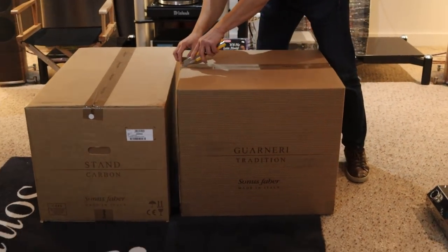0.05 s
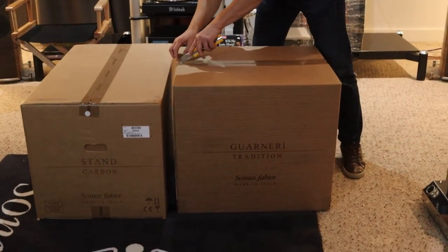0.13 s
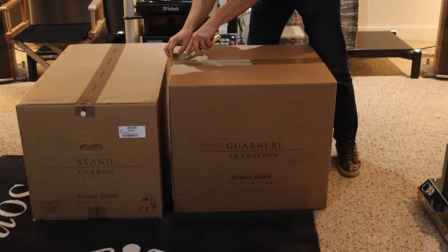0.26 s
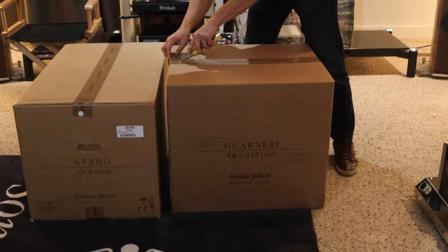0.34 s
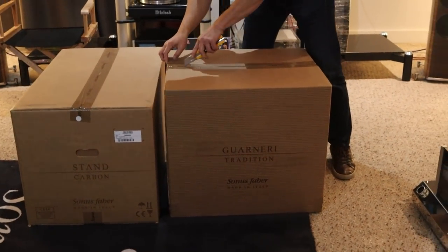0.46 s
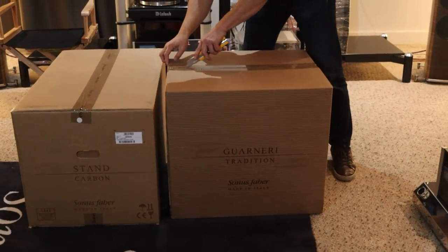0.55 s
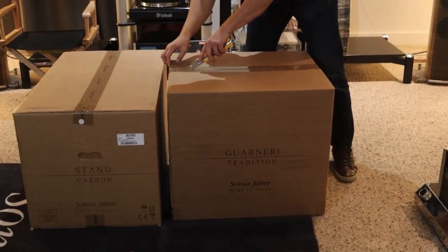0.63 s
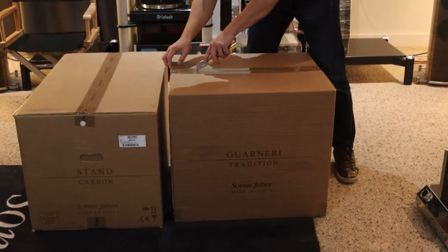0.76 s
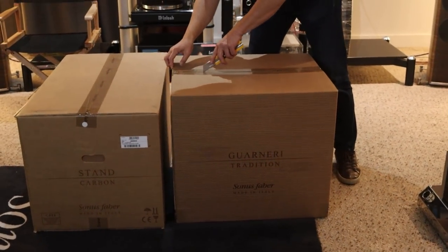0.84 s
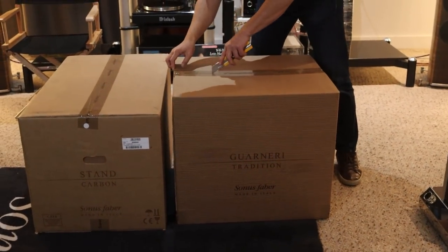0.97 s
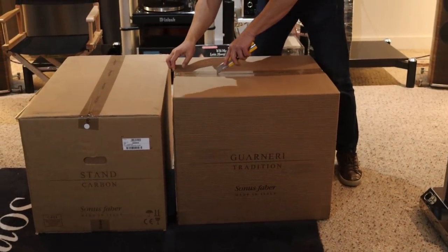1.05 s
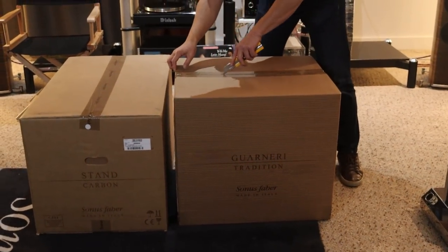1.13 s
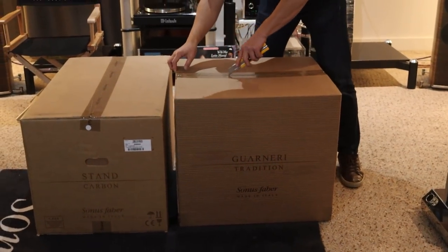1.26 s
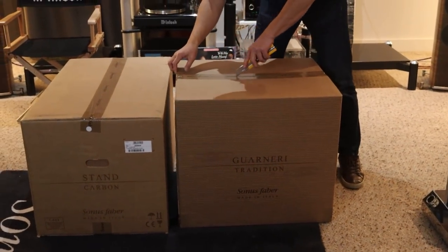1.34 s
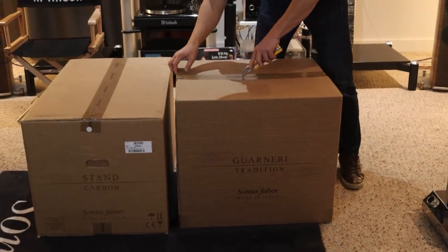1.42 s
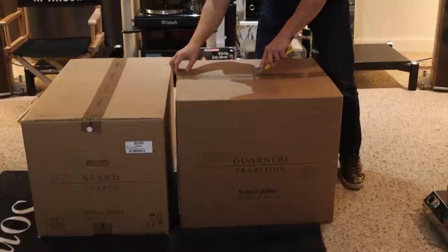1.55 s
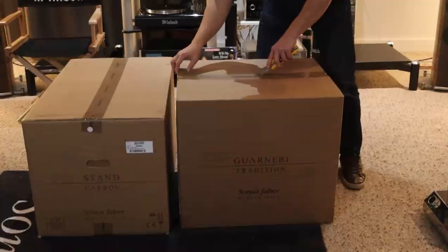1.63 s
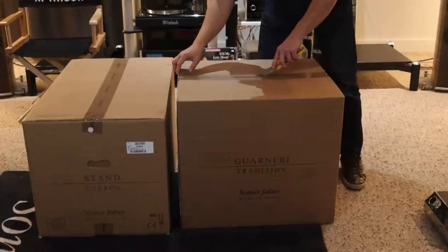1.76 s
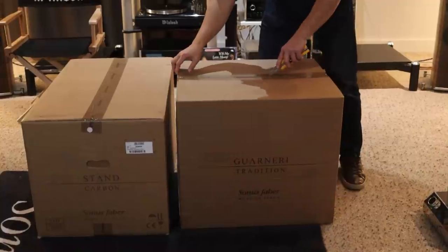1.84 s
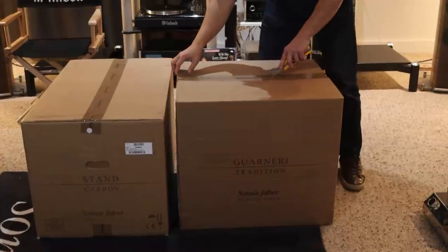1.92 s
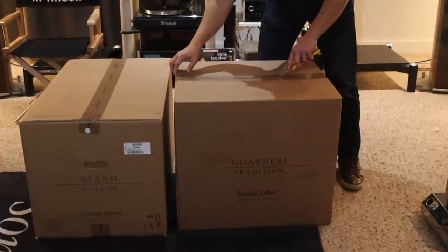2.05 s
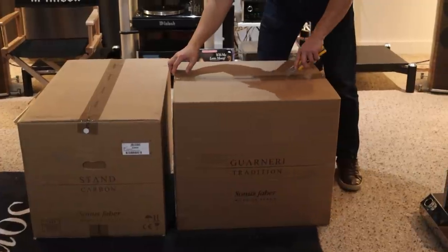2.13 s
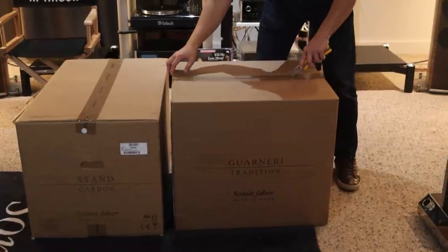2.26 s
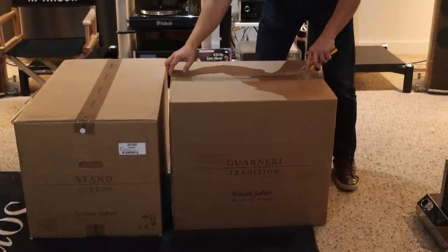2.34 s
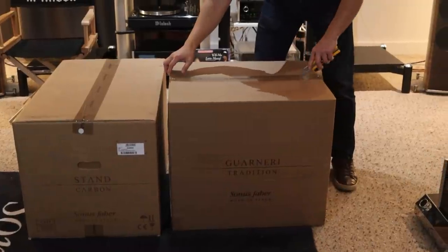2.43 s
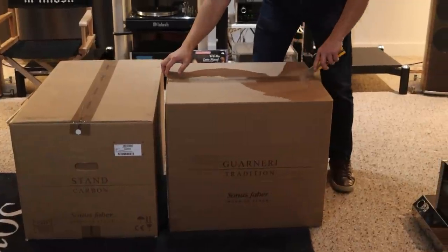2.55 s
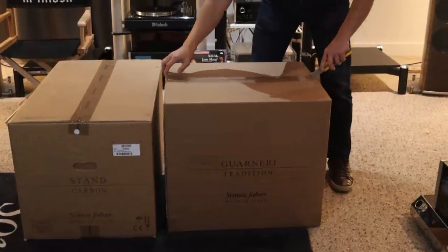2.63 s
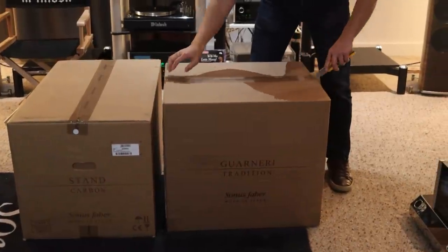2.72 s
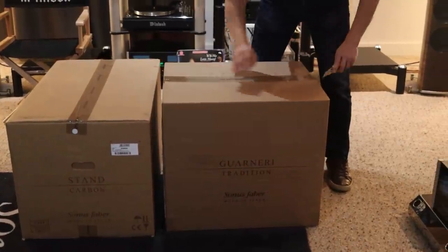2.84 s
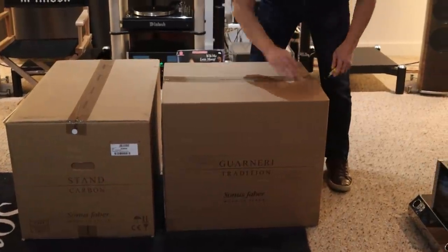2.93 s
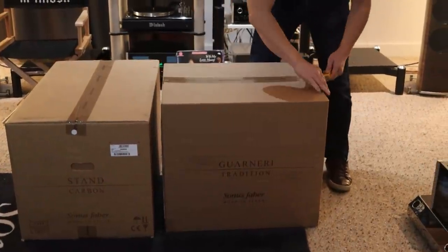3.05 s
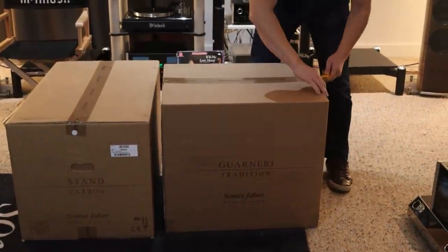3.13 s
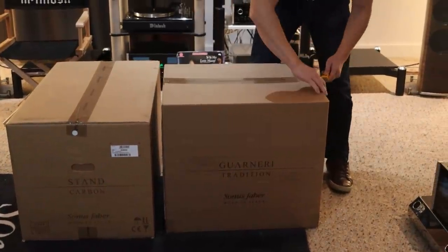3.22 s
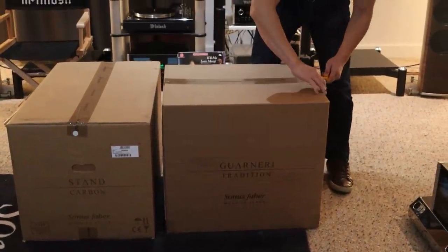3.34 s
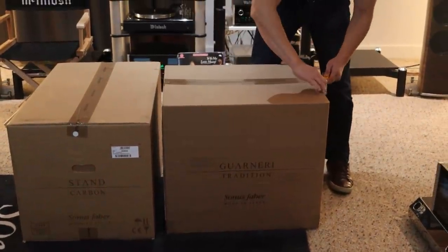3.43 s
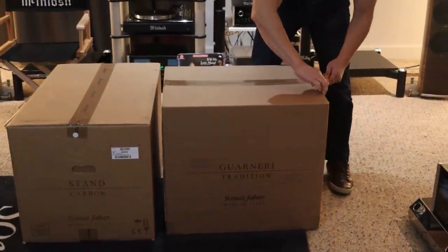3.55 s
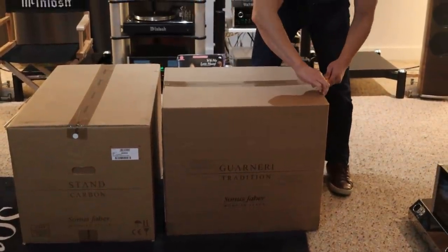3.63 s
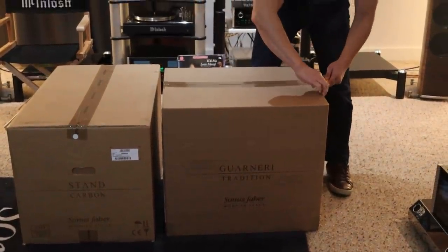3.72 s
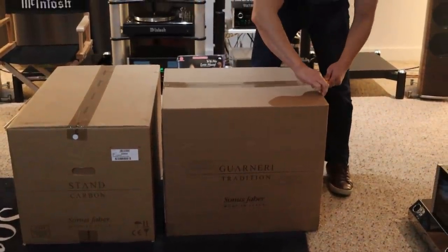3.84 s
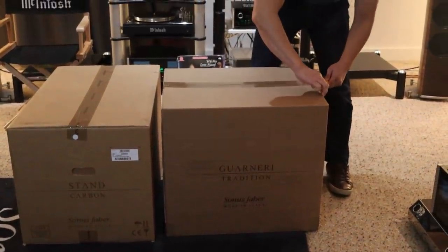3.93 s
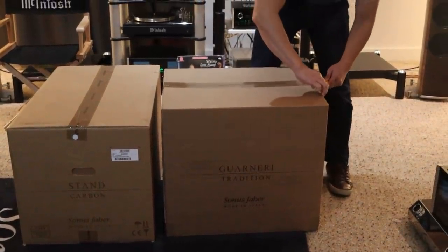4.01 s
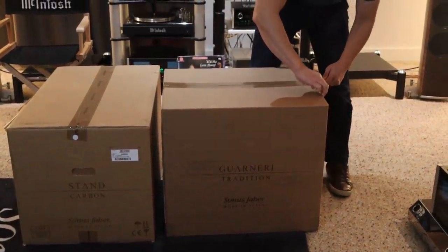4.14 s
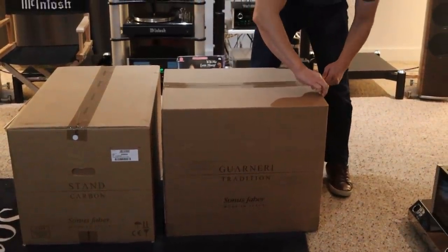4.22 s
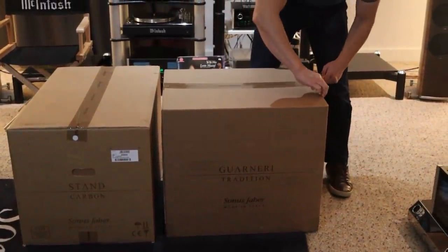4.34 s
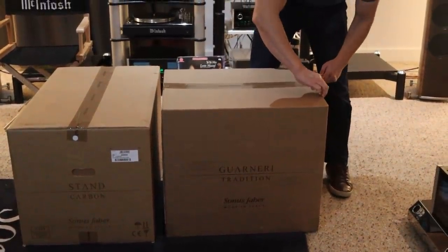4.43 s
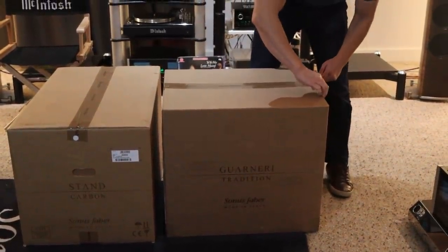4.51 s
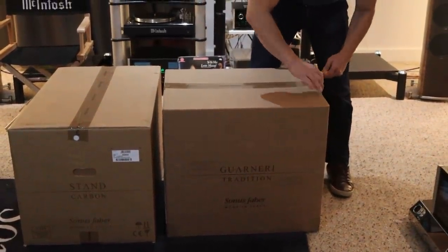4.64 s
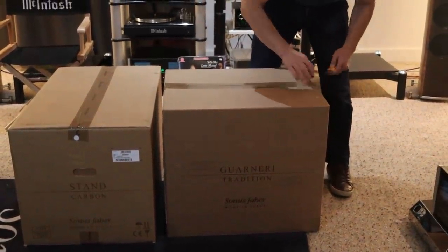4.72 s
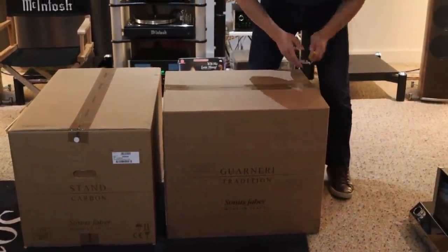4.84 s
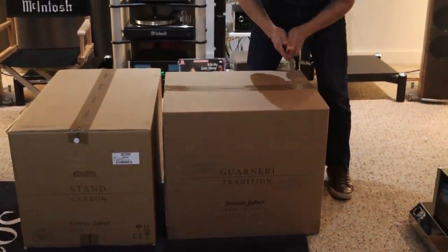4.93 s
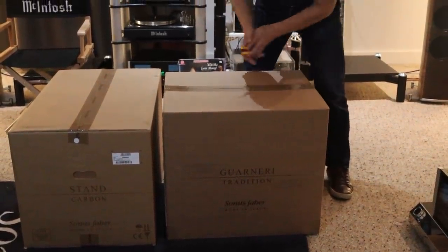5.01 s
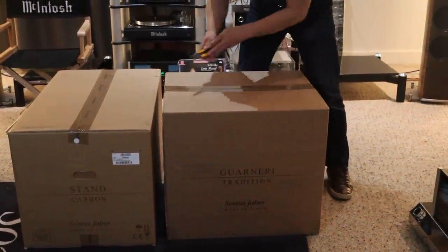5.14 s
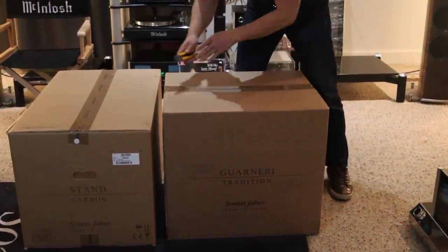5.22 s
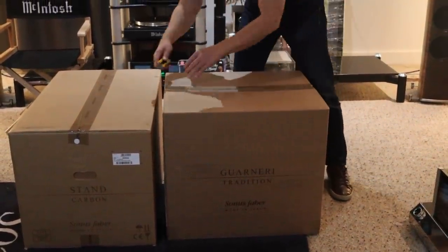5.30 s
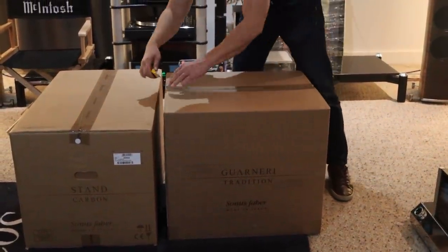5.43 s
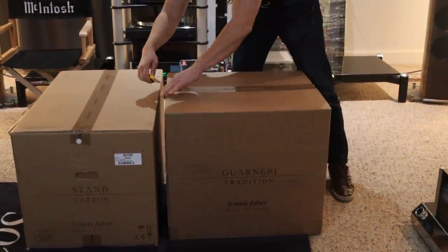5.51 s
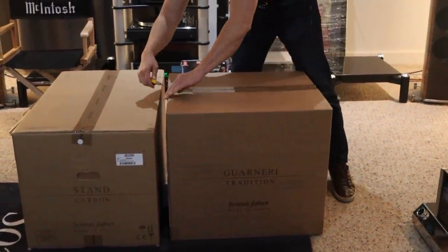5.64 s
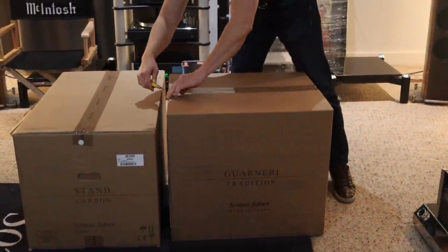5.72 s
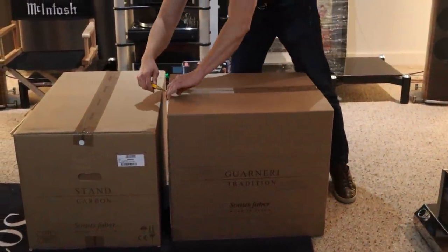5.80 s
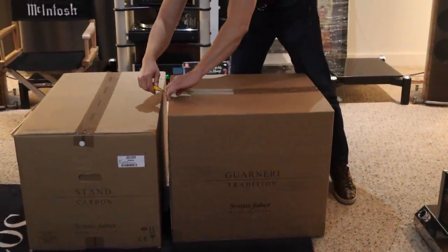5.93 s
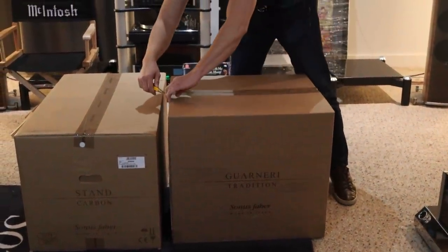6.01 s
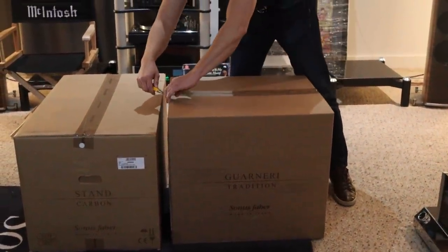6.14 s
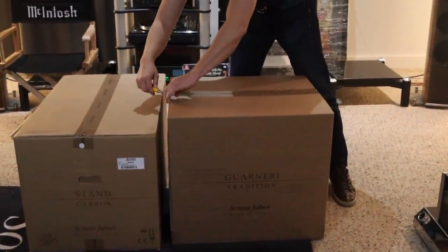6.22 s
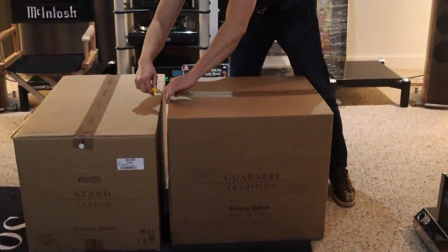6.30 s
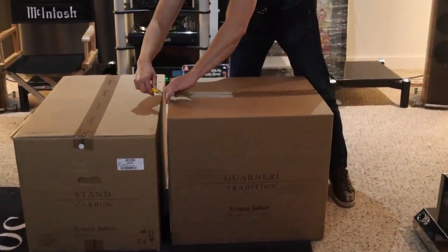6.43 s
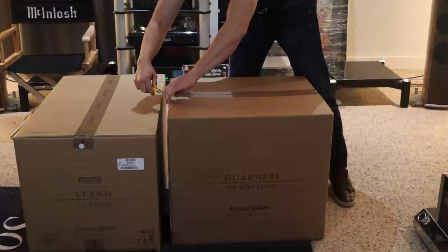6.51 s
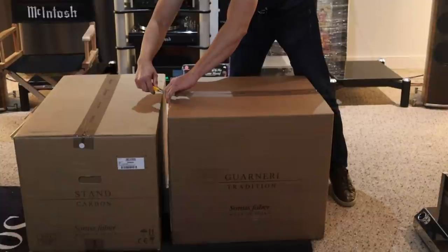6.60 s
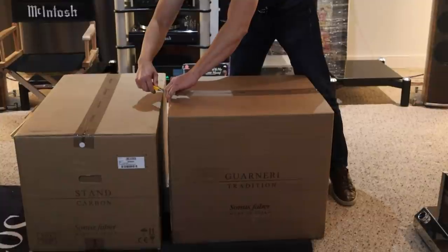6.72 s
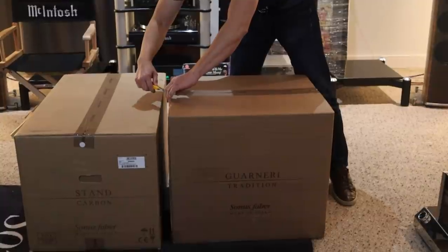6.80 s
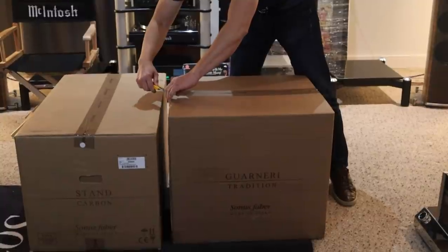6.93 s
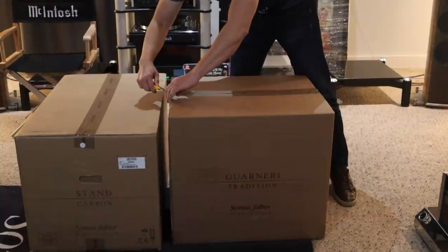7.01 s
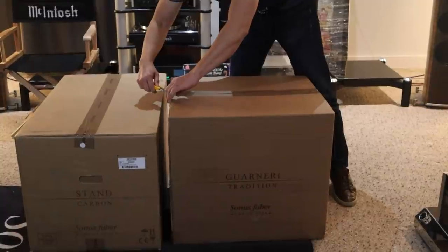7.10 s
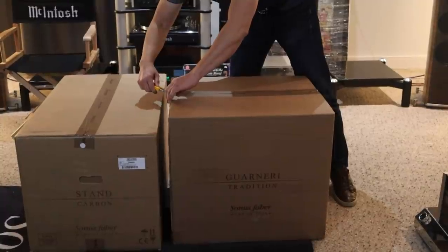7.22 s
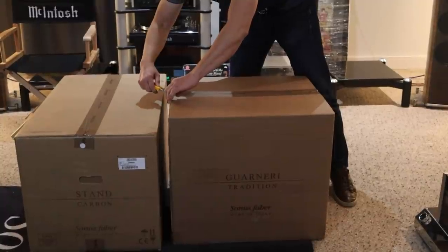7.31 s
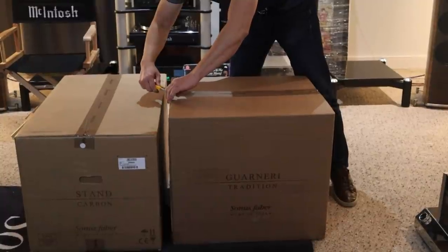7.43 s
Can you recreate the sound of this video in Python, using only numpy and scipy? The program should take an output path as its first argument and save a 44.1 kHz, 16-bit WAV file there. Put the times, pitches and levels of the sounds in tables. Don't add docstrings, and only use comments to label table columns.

```python
import sys
import numpy as np
from scipy import signal
from scipy.fft import rfft, irfft
from scipy.io import wavfile

SR = 44100
rng = np.random.default_rng(int(sys.argv[2]) if len(sys.argv) > 2 else 0)


def unload_wav(signal):
    wavfile.write(
        sys.argv[1],
        SR,
        np.round(np.clip(np.atleast_2d(signal).T, -1, 1) * 32767).astype(np.int16),
    )


def attenuation_scalar(level_db):
    decades = np.asarray(level_db, float) / 20
    return 10 ** decades


N = 328986

# f/Hz, level/dB per Hz
HISS = [(15, -83.5), (25, -52), (92, -14), (102, -3.5), (123, -2.5), (149, -25), (242, -13), (301, -26.5),
        (363, -17), (439, -25), (1070, -25.5), (1290, -30), (4140, -33.5), (12500, -29.5), (16000, -33.5)]
# f/Hz, rms level/dB
HUM = [
    (120, -76),
    (12300, -92.5),
]
# t/s, film level/dB, then board, panels, hollow (each level/dB above the film),
# unevenness of the slips/dB
STROKES = [
    [(0.0, -75, 5.5, 5, -1, -0.5), (0.172, -53, -8.5, -2, -11, 3.5), (0.236, -68, -3, 22, 19, 5),
     (0.314, -64, -5, 5.5, 0, 5.5), (0.338, -35, 7, 18.5, -14.5, 4.5), (0.364, -50, 0, 17, 8.5, 2.5),
     (0.582, -33, 0.5, 2, -7.5, 3.5), (0.752, -64.5, 3.5, 9, 5, 3.5), (0.8, -71, -16, 15, -3, 3)],
    [(0.8, -63, -5, 21, -3, 2), (0.86, -68, -12, 9, -12, 2), (0.872, -32, -12, -5.5, -33, 2.5),
     (0.902, -40, -5.5, -2, -22.5, 4.5), (1.148, -41.5, -1.5, 3, -18, 3.5), (1.242, -50, -3, 5.5, 7, 2),
     (1.32, -53.5, -6.5, 3.5, 5.5, 3)],
    [(1.32, -52.5, -8.5, -1, 3.5, 5), (1.348, -42, -2.5, 8.5, -6, 2.5), (1.446, -22.5, -3.5, -2.5, -9.5, 3),
     (1.512, -27, 1, 3, -16, 4.5), (1.534, -19.5, -5.5, -7.5, -17.5, 8), (1.572, -19, -6.5, -5.5, -14, 0.5),
     (1.634, -22.5, -4.5, -5, -30.5, -0.5), (1.698, -33.5, 1.5, 3, -5.5, 3), (1.864, -36, -1.5, 0, -6, 5),
     (2.056, -35.5, -5.5, 0, -5.5, 3.5), (2.186, -28.5, -11.5, -4, -26, 3),
     (2.498, -42, -2.5, -3, -17, 2.5), (2.58, -65, -7, -7, -9.5, -1.5)],
    [(2.58, -50, -4, 7, -23.5, 4.5), (2.64, -29, -3, -2.5, -39.5, 0), (2.714, -22.5, -2.5, 9.5, -0.5, 4.5),
     (2.836, -48, 2, -2, -10, 5), (2.92, -81.5, 4, -3.5, 7, 3)],
    [(3.16, -95, 10.5, 17.5, 1, 2.5), (3.188, -46.5, -18.5, -26.5, -35, 4),
     (3.484, -56, -16, -7, -15, -0.5), (3.512, -33, 2.5, -4.5, -35, 2), (3.61, -69.5, -13.5, -1.5, -4, 1.5),
     (3.652, -44, -1, -1, -41.5, 4.5), (3.75, -80, -1.5, 8, 12.5, 2.5)],
    [(3.97, -89.5, -14.5, -2, 12, -1.5), (4.06, -26.5, -16.5, -8.5, -33.5, 3),
     (4.178, -74.5, -3, -3, 9, 3.5), (4.196, -20, -4, -6.5, -25, -0.5), (4.228, -32.5, 2, 3.5, -2, 5),
     (4.342, -45, -16, -32, -46, 3), (4.458, -39.5, -9, -13.5, -14.5, -0.5),
     (4.686, -56.5, -4.5, -6, -24.5, 8), (4.754, -25, 7.5, -5.5, -11.5, 0),
     (4.9, -97.5, 11.5, -3, 16.5, 2.5)],
    [(5.63, -91, -1, 0.5, 11, 2.5), (5.666, -50, -4, 18, -5, -0.5), (5.698, -58, 0, 5, 3.5, 8.5),
     (5.744, -46.5, -11.5, -7.5, -23.5, 0), (5.886, -73, -8.5, 2.5, -1, 4), (6.1, -73.5, -7, -5, -8, 4)],
    [(6.34, -85, -10, -19.5, 1, 4), (6.376, -24, -7.5, -5, -20, 4.5), (6.424, -45.5, -2.5, -0.5, -2, 3),
     (6.554, -37.5, -5, -10, -47, 1.5), (6.67, -31, -8, -5, -18.5, 2), (6.8, -92, -7, -15, 19, 4)],
    [(6.93, -92, -1.5, 5, -1.5, 4), (6.97, -32.5, -3.5, -8.5, -26, 6), (7.106, -93.5, -9, 0, 15, 5),
     (7.122, -55, -32, -34, -27, 3.5), (7.234, -85, -2, 4, 2, 3.5), (7.37, -32.5, -9, -10.5, -20.5, 1.5),
     (7.46, -50.5, -3.5, -12, -22, 7)],
]
# t/s, film peak level/dB, then board, panels, hollow (each level/dB above the film),
# tearing t60/s
SNAPS = [(0.0922, -41, -7, -9.5, -29, 0.012), (0.172, -44, -23, -8, -15, 0.012),
         (0.2174, -69, -14, -4, 5, 0.012), (0.3311, -28, -25, 15.5, -35, 0.012),
         (0.3384, -28, -9.5, 4, -15, 0.012), (0.4055, -32, -13, 2.5, -20, 0.012),
         (0.4319, -13.5, -6.5, 6.5, -7, 0.012), (0.4479, -17, -16, -8.5, -4.5, 0.012),
         (0.5287, -20.5, -31, -27, -23, 0.012), (0.5506, -22, -33, -9.5, -21, 0.012),
         (0.5651, -15, -23, -17, -12, 0.012), (0.5764, -16.5, -23.5, -25, -24, 0.012),
         (0.5854, -19.5, -21, -9, -35, 0.012), (0.5906, -10.5, -20, -34, -29, 0.012),
         (0.6799, -25, -14, -2, -20, 0.012), (0.7991, -45, -23, -4.5, -25, 0.012),
         (0.8515, -36, -11, -2, -32, 0.012), (0.8724, -12, -37, -32, -51, 0.012),
         (1.0321, -29, -22, -13, -31, 0.012), (1.1104, -27, -6, -6, -37, 0.012),
         (1.1907, -30.5, -26, -2, -21, 0.012), (1.2131, -20, -16, -12, -22, 0.012),
         (1.3389, -27, -12.5, -2, -18, 0.012), (1.6841, -9, -16, -17, -15, 0.012),
         (1.7724, -11, -15, -24, -29, 0.012), (1.8467, -16.5, -12.5, -23.5, -27, 0.012),
         (1.8856, -7.5, -22, -26.5, -34, 0.012), (2.3047, -18.5, -30, -14, -38, 0.012),
         (2.3501, -17.5, -14, -13, -41, 0.012), (2.3935, -17.5, -22, -19, -39, 0.012),
         (2.4753, -17.5, -25, -16, -40, 0.012), (2.587, -31.5, -11, -3.5, -41, 0.012),
         (2.6164, -23, -14, -8, -46, 0.012), (2.6379, -15, -16.5, -12, -50, 0.012),
         (2.6813, -10.5, -15.5, -2.5, -25, 0.012), (2.7004, -9.5, -11.5, -7, -33, 0.012),
         (2.7072, -3, -18, -14.5, -25, 0.012), (2.7442, -14, -21.5, -14, -23, 0.012),
         (2.825, -20, -7.5, -28, -38.5, 0.012), (3.1882, -39.5, -30, -35, -36, 0.012),
         (3.5069, -22, -8.5, -25.5, -33, 0.012), (3.5543, -33, -3, -23, -33, 0.012),
         (3.6461, -25.5, -6, -4, -47, 0.012), (3.8294, -54, -15, 2.5, -17, 0.012),
         (4.0287, -43, -3.5, -13, -33, 0.012), (4.0632, -9.5, -12, -31, -44, 0.012),
         (4.1959, -3, -16, -14, -40, 0.012), (4.2602, -13.5, -15.5, -8, -32, 0.012),
         (4.3101, -13, -18, -25.5, -46, 0.012), (4.4164, -17, -10, -16.5, -33, 0.012),
         (4.4623, -9.5, -11.5, -44, -47, 0.012), (4.4734, -19, -13, -11, -51, 0.012),
         (4.7032, -31.5, -16.5, -8, -25, 0.012), (4.7441, -7, -2.5, -11.5, -33.5, 0.012),
         (5.6595, -34, -2, 4.5, -18.5, 0.012), (6.3719, -5.5, -36.5, -34.5, -46, 0.012),
         (6.4662, -20.5, -20.5, -17, -35, 0.012), (6.5799, -18.5, -20, -20, -49, 0.012),
         (6.8473, -50, -19, -19, -22, 0.012), (6.9636, -20, -1, -14, -37, 0.012),
         (7.1252, -45, -37, -33, -34.5, 0.012), (7.2918, -29.5, -10, -8.5, -24, 0.012),
         (7.3572, -15, -24, -14, -45, 0.012), (7.433, -26, -21, -31, -35, 0.012)]
# t/s, peak level/dB, f/Hz, t60/s
THUMPS = [(0.219, -45, 72.7, 0.2), (0.329, -40, 67.3, 0.2), (0.559, -64, 129, 0.2), (0.759, -57, 91.5, 0.2),
          (1.209, -44, 129, 0.2), (2.699, -55, 129, 0.2), (4.059, -66, 129, 0.2), (4.249, -32.5, 129, 0.2),
          (4.449, -42, 96.9, 0.2), (4.749, -66, 129, 0.2), (5.429, -54, 121, 0.2), (6.37, -54, 110, 0.2),
          (6.689, -44, 94.2, 0.2), (6.966, -45, 110, 0.2), (7.292, -45.5, 96.9, 0.2),
          (7.399, -58, 94.2, 0.2)]
# t/s, peak level/dB, f/Hz, t60/s
TICKS = [
    (3.1004, -62, 2340, 0.05),
    (3.1383, -56.5, 1820, 0.05),
    (5.467, -58, 1650, 0.05),
]
# f/Hz, level/dB per Hz
FILM = [(2350, -31), (4000, -10), (4410, -7), (4650, -3), (6820, 1.5), (8360, 2), (9770, -3.5),
        (12500, -14.5), (13800, -15.5), (16000, -34)]
# f/Hz, width/Hz, level/dB
BOARD = [(1670, 150, 0.5), (2000, 180, -1), (2480, 160, 1), (2940, 200, 1.5), (3600, 400, 2.5),
         (4200, 500, -5.5)]
# f/Hz, width/Hz, level/dB
PANELS = [(374, 25, -5.5), (474, 35, -5), (552, 30, 0), (598, 30, -1.5), (650, 35, -6.5), (745, 50, -6),
          (917, 60, -8.5), (1080, 90, -11), (1225, 25, -5), (1350, 120, -15.5)]
# f/Hz, width/Hz, level/dB
HOLLOW = [(149, 14, -3), (192, 18, 1), (227, 18, -5), (270, 30, -12.5)]


def rms_one(x):
    return x / np.sqrt(np.mean(x ** 2) + 1e-20)


def through(x, response):
    return signal.oaconvolve(x, response)[:N]


def drift(rate):
    knots = rng.standard_normal(2000)
    return np.interp(np.arange(N) * rate / SR, np.arange(len(knots)), knots)


def coloured(spectrum, size=4096):
    hz, db = np.transpose(spectrum)
    grid = np.arange(size // 2 + 1) * SR / size + 1
    log_gain = np.log(attenuation_scalar(np.interp(np.log(grid), np.log(hz), db)))
    cepstrum = irfft(log_gain)
    cepstrum[1:size // 2] *= 2
    response = irfft(np.exp(rfft(cepstrum[:size // 2], size)))
    return response / np.linalg.norm(response)


def modal(modes):
    t = np.arange(SR // 5) / SR
    response = np.zeros(len(t))
    for k, (hz, width, db) in enumerate(modes):
        ring = np.exp(-np.pi * width * t) * np.sin(2 * np.pi * hz * t)
        response += (-1) ** k * attenuation_scalar(db) * width * ring
    return response / np.linalg.norm(response)


def background(loud):
    t = np.arange(N) / SR
    hiss = attenuation_scalar(-65.5 + 0.5) * through(rng.standard_normal(N), coloured(HISS))
    recent = signal.lfilter([1e-4], [1, -1 + 1e-4], np.abs(loud))
    duck_db = -5.0 * np.tanh(recent / .002)
    hum = np.zeros(N)
    for hz, db in HUM:
        hum += np.sqrt(2) * attenuation_scalar(db + 1.5 * drift(9)) * np.sin(2 * np.pi * hz * t)
    return hiss * attenuation_scalar(duck_db + .8 * drift(4)) + hum


def strokes():
    slips_per_s, rip_per_s = 5000, 330
    t, levels, uneven_db = np.arange(N) / SR, np.zeros((4, N)), np.zeros(N)
    for rows in STROKES:
        s, film_db, *rel_db, uneven = np.transpose(rows)
        on = (t >= s[0]) & (t < s[-1])
        levels[:, on] = [attenuation_scalar(np.interp(t[on], s, film_db + r)) for r in [0, *rel_db]]
        uneven_db[on] = np.clip(np.interp(t[on], s, uneven), 0, 6)
    born = rng.random(N) < slips_per_s / SR
    size_db = uneven_db * np.minimum(rng.exponential(1, N), 4.5)
    sizes = attenuation_scalar(size_db) * rng.choice([-1, 1], N)
    clumps = attenuation_scalar(2.5 * drift(70) + 1.5 * drift(230))
    slips = born * sizes / attenuation_scalar(uneven_db * 1.6) * clumps
    crack_count = np.floor(np.cumsum(rip_per_s * attenuation_scalar(3.5 * drift(200)) / SR))
    cracks = np.diff(crack_count, prepend=0)
    pull = np.interp(t, [1.42, 1.55, 1.64, 1.72], [0, 1, 1, 0])
    rip = 9 * pull * cracks * attenuation_scalar(3.5 * rng.standard_normal(N))
    slips = rms_one(slips) * (1 - .6 * pull) + rip
    return levels * slips * attenuation_scalar(-3.0)


def room(x):
    t60_s, level_db = .17, -7.5
    t = np.arange(SR // 3) / SR
    build_up = np.clip((t - .0015) / .004, 0, 1)
    tail = rng.standard_normal(len(t)) * attenuation_scalar(-60 * t / t60_s) * build_up
    return x + attenuation_scalar(level_db) * through(x, tail / np.linalg.norm(tail))


def snaps():
    length = 4000
    out, t = np.zeros((4, N + length)), np.arange(length) / SR
    body_trim_db = np.array([0, 5.0, 9.5, 16.0])
    for s, film_db, *rel_db, t60 in SNAPS:
        noise = rng.standard_normal((2, length))
        burst = noise[0] * np.abs(noise[1]) * attenuation_scalar(-60 * t / max(t60, .001))
        burst[0] = 2.5
        share = np.sqrt(.012 / max(t60, .001))
        levels = attenuation_scalar(film_db - 7 + np.array([0, *rel_db]) + body_trim_db)
        at = round(s * SR)
        out[:, at:at + length] += np.outer(levels, burst * share)
    return out[:, :N]


def rings(events, rise_cycles):
    out, t = np.zeros(N + SR), np.arange(SR // 2) / SR
    for s, db, hz, t60 in events:
        at = round(s * SR)
        swell = 1 - np.exp(-t * hz / rise_cycles)
        out[at:at + len(t)] += attenuation_scalar(db - 60 * t / t60) * swell * np.sin(2 * np.pi * hz * t)
    return out[:N]


def thumps():
    return rings(THUMPS, rise_cycles=.7)


def ticks():
    return rings(TICKS, rise_cycles=.6)


def scene():
    bodies = [coloured(FILM), modal(BOARD), modal(PANELS), modal(HOLLOW)]
    drives = strokes() + snaps()
    box = sum(through(drive, body) for drive, body in zip(drives, bodies))
    near = room(box + ticks()) + thumps()
    return (near + background(near))[None]


def band_limit(x):
    return signal.sosfilt(signal.butter(12, 16810, fs=SR, output="sos"), x)


def record(dry):
    mix = .9 * np.tanh(dry / .9)
    return band_limit(mix)


dry = scene()
out = record(dry)
unload_wav(out)
```